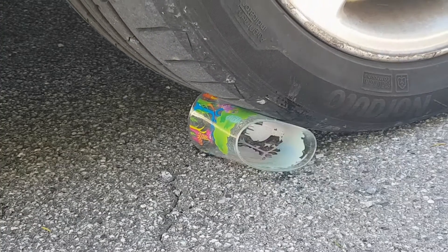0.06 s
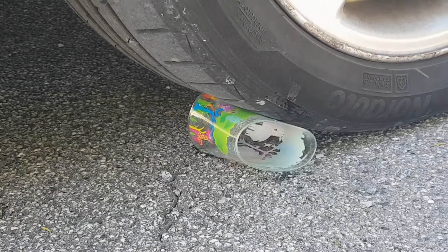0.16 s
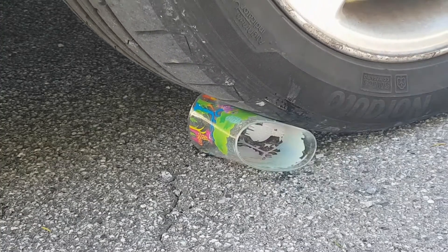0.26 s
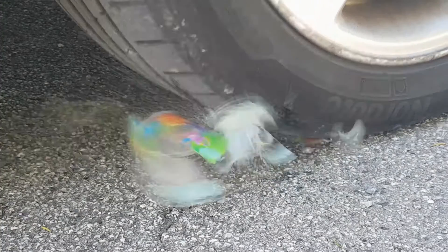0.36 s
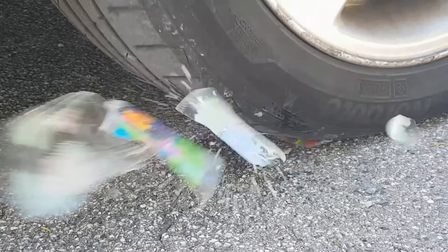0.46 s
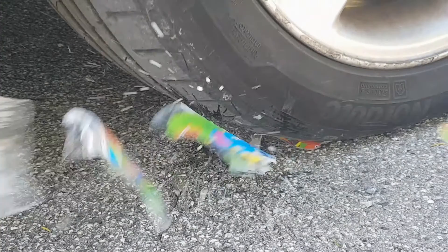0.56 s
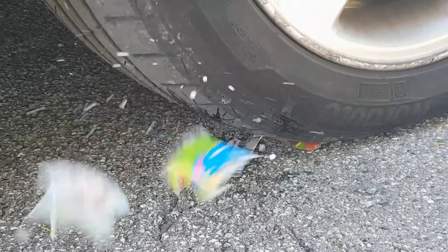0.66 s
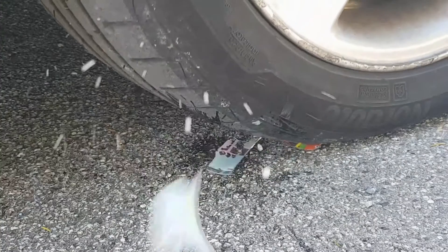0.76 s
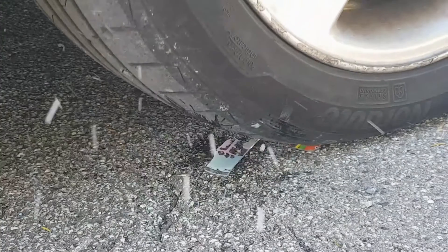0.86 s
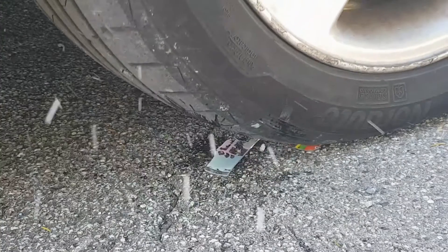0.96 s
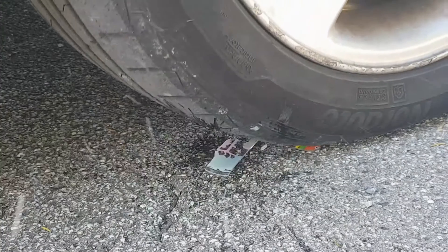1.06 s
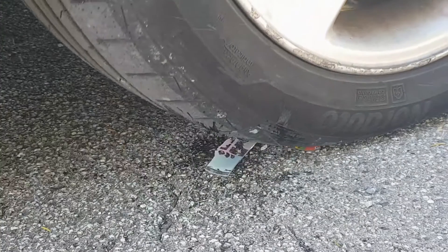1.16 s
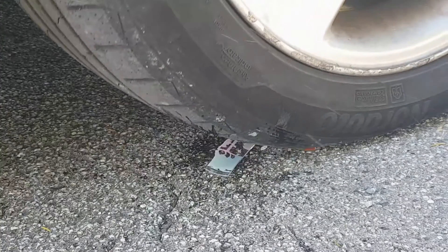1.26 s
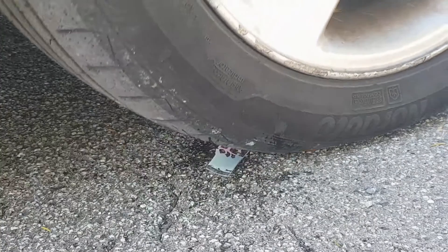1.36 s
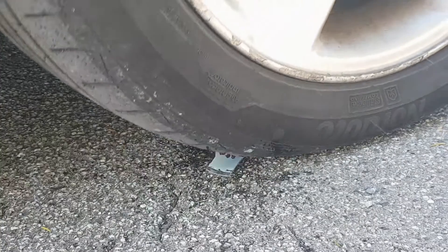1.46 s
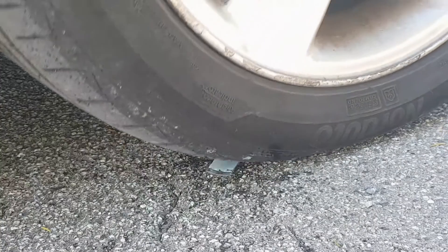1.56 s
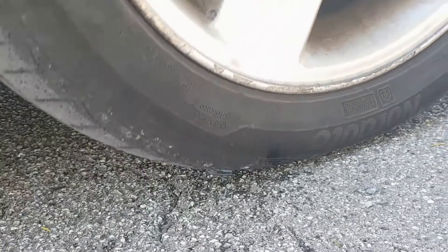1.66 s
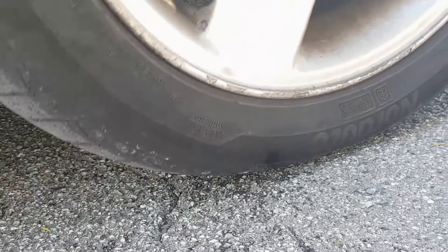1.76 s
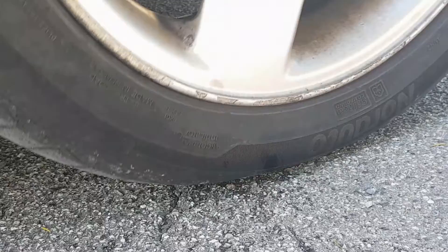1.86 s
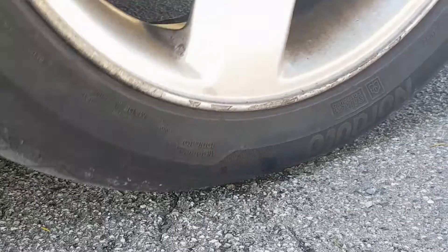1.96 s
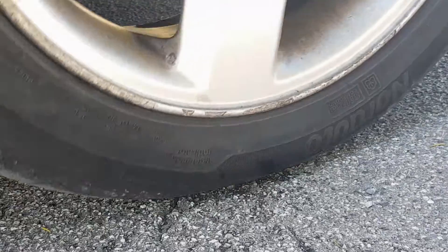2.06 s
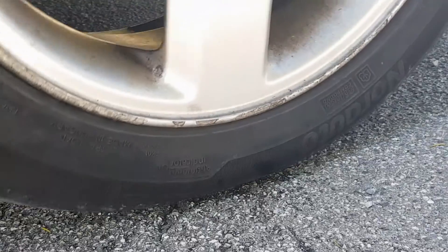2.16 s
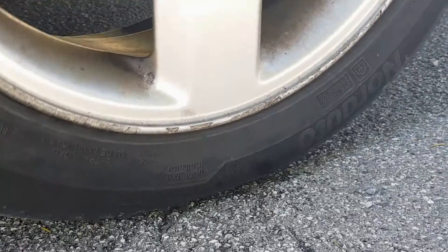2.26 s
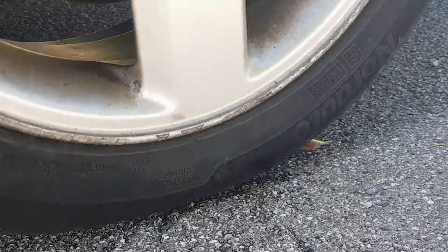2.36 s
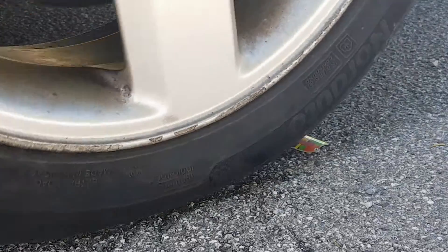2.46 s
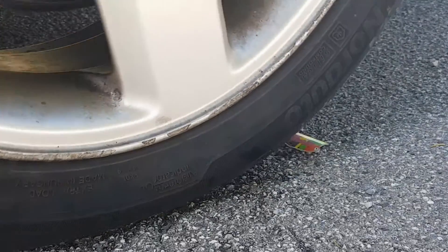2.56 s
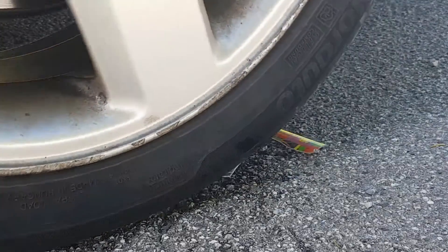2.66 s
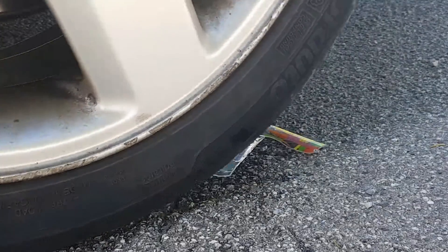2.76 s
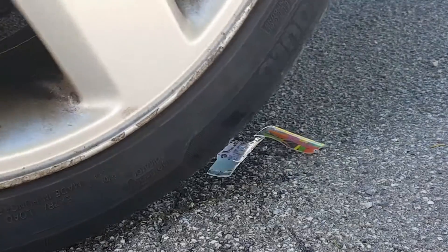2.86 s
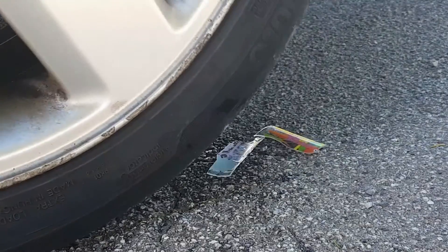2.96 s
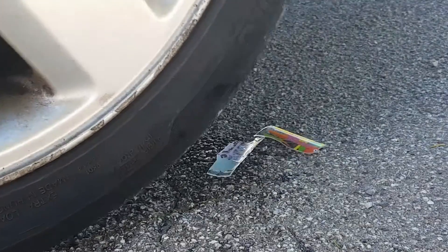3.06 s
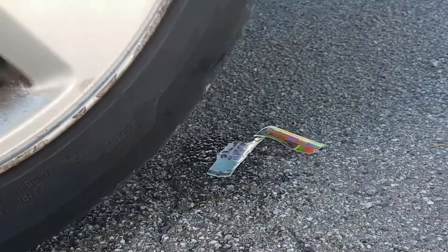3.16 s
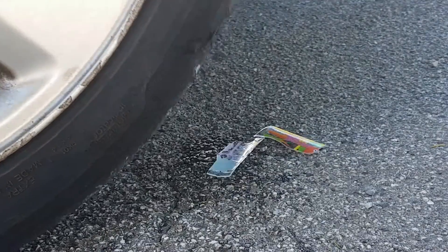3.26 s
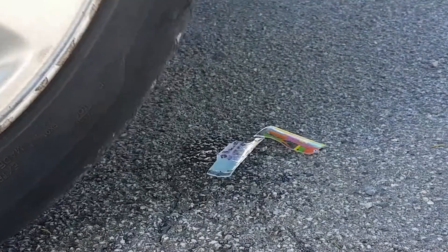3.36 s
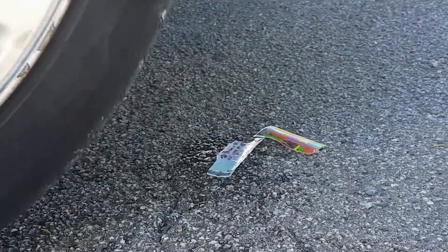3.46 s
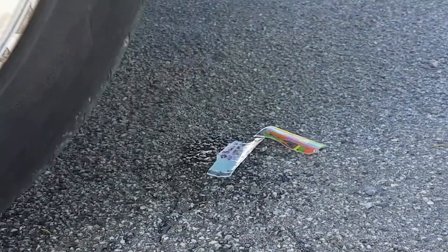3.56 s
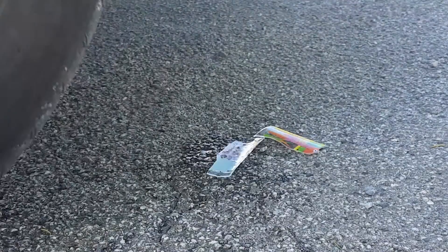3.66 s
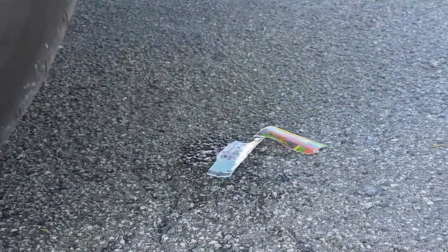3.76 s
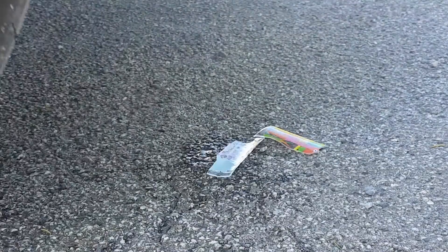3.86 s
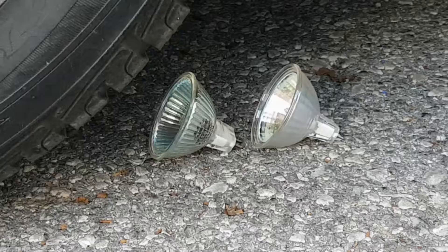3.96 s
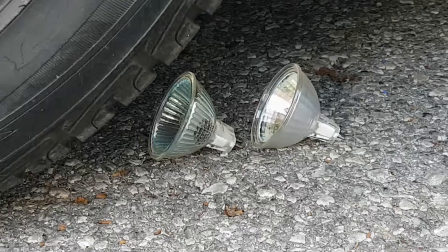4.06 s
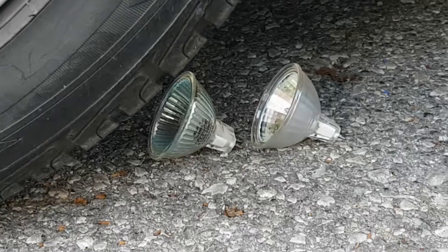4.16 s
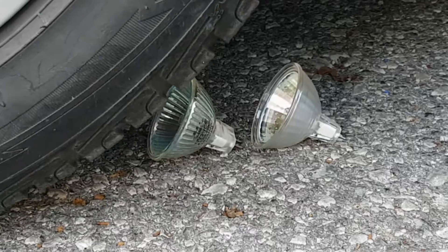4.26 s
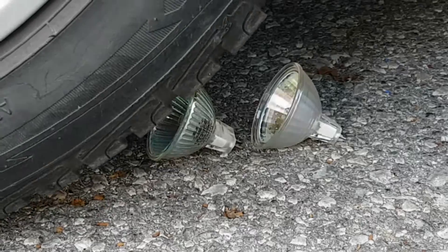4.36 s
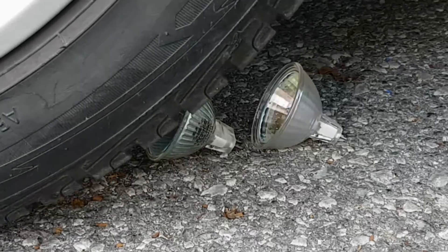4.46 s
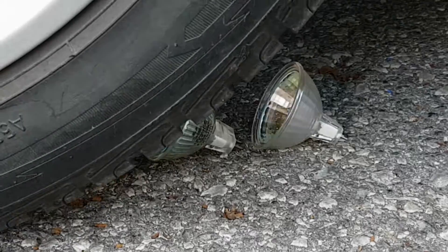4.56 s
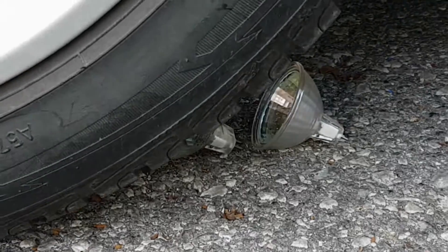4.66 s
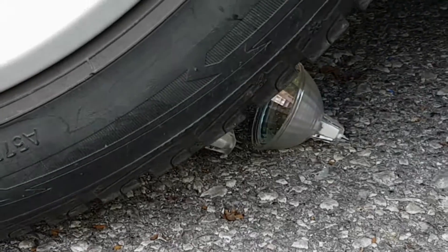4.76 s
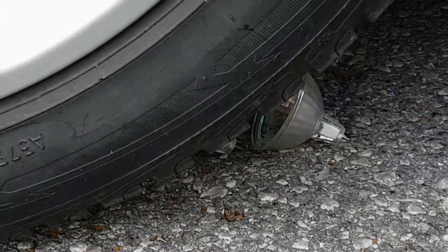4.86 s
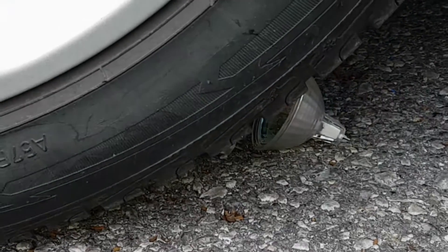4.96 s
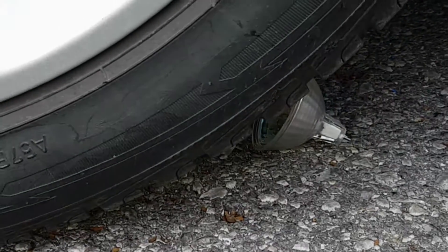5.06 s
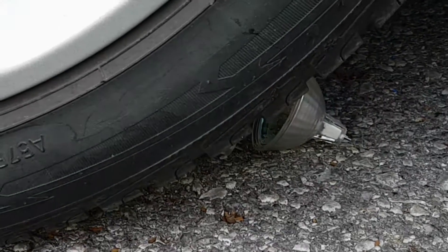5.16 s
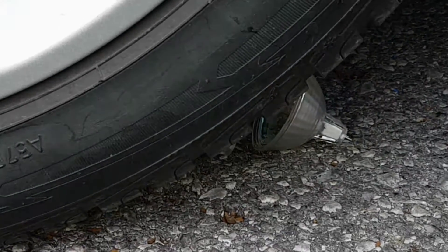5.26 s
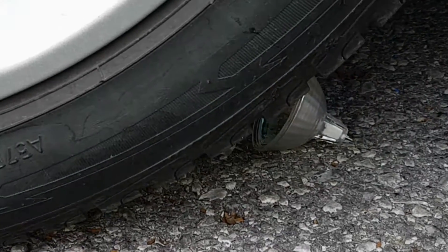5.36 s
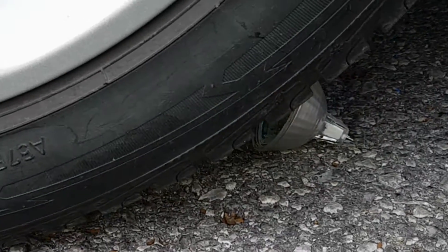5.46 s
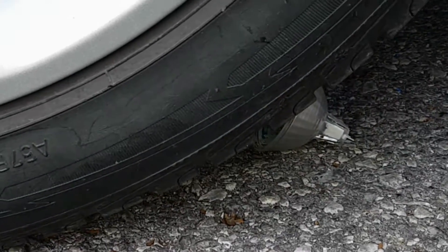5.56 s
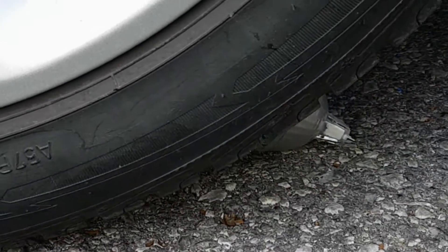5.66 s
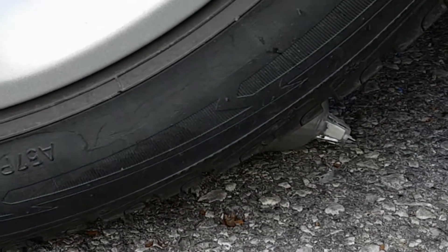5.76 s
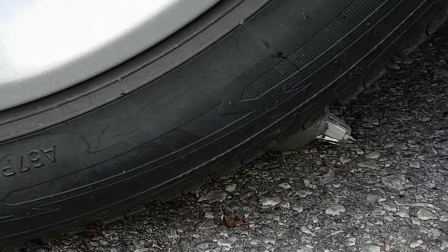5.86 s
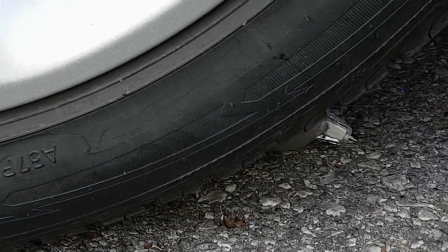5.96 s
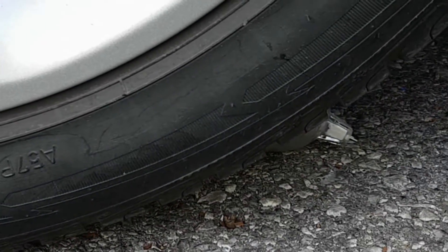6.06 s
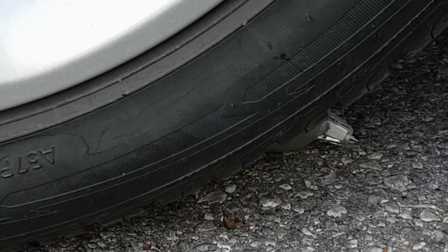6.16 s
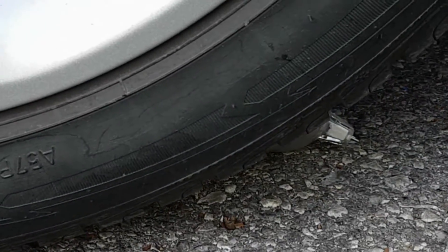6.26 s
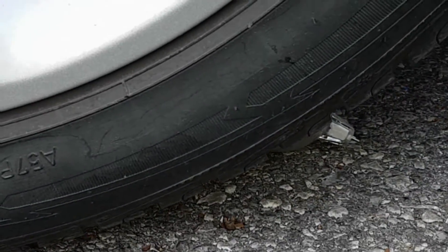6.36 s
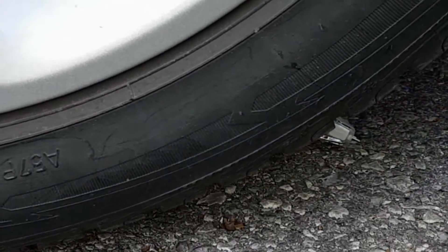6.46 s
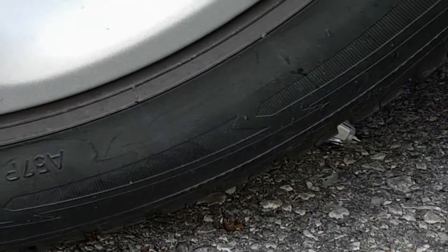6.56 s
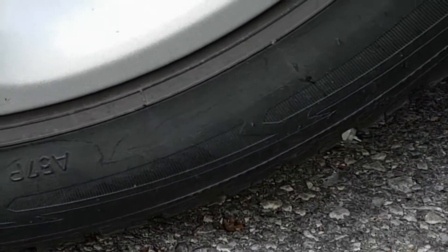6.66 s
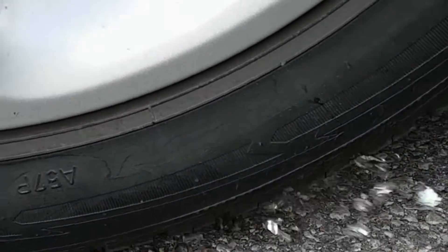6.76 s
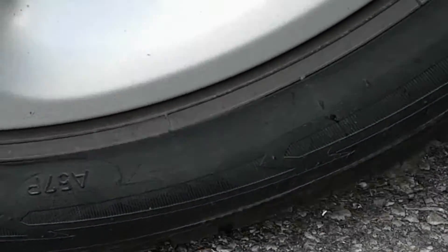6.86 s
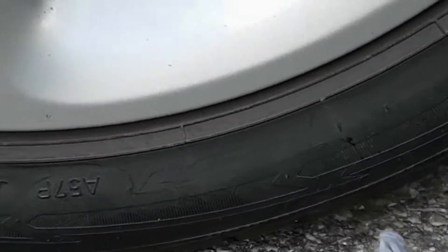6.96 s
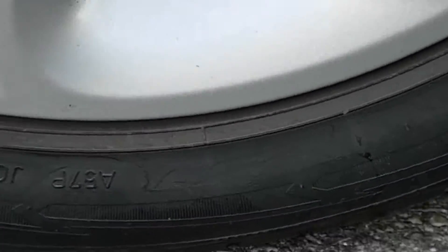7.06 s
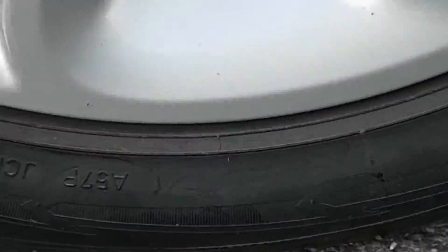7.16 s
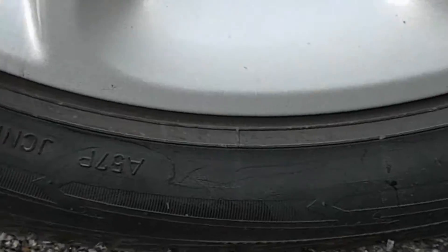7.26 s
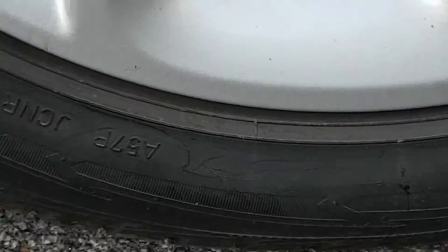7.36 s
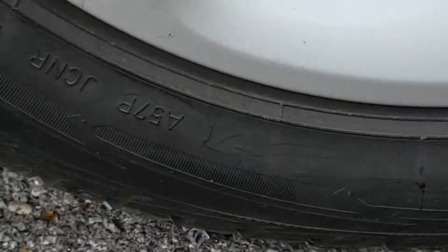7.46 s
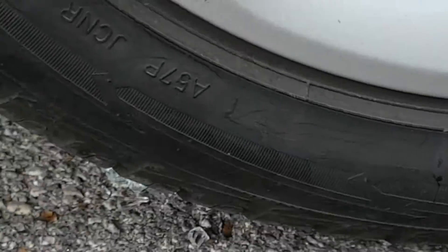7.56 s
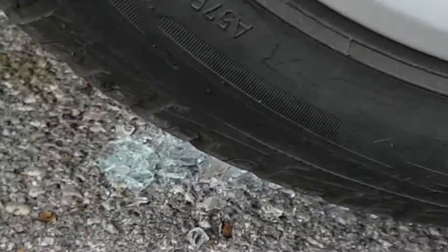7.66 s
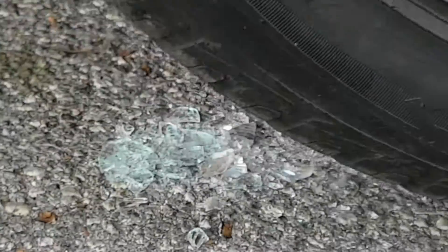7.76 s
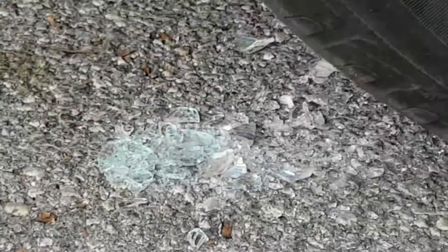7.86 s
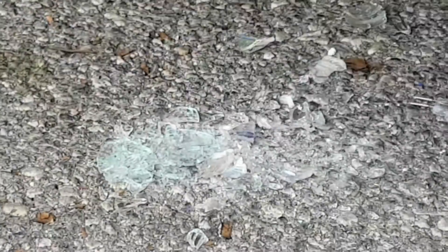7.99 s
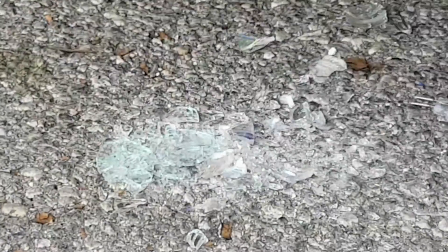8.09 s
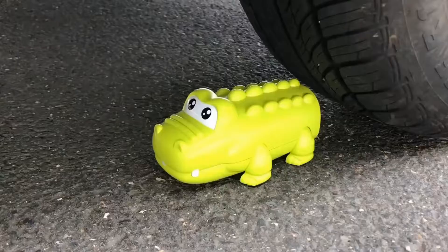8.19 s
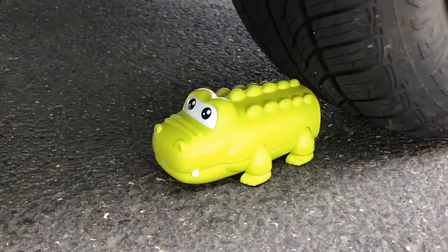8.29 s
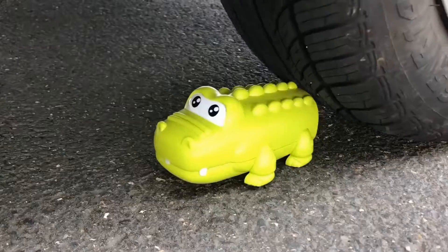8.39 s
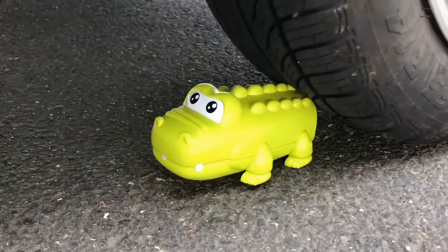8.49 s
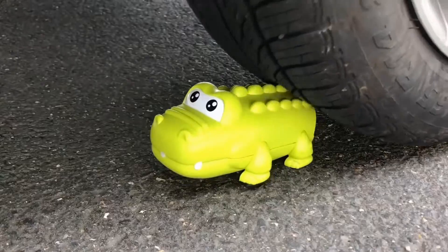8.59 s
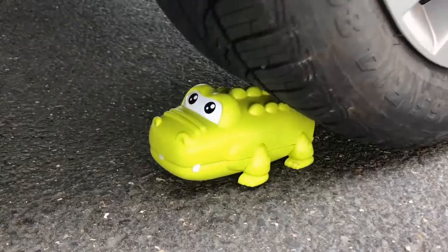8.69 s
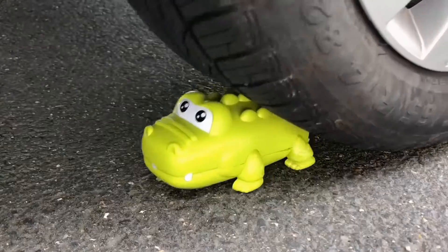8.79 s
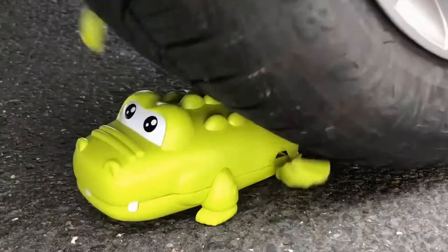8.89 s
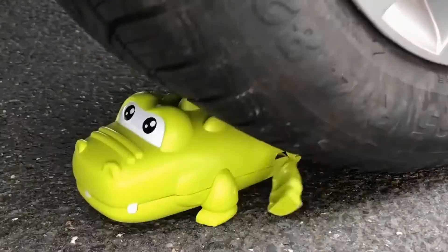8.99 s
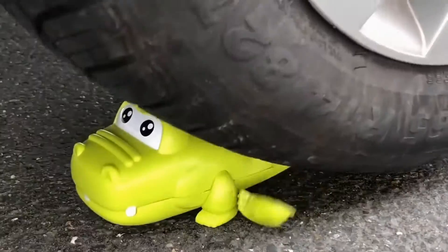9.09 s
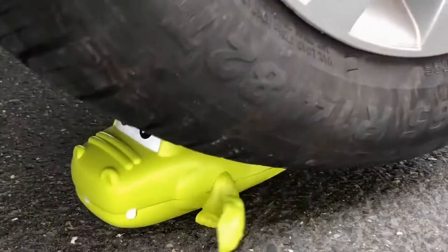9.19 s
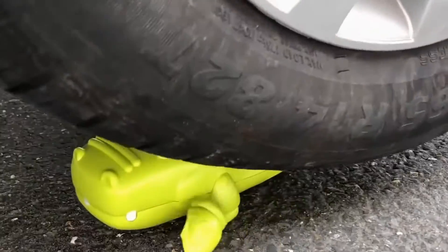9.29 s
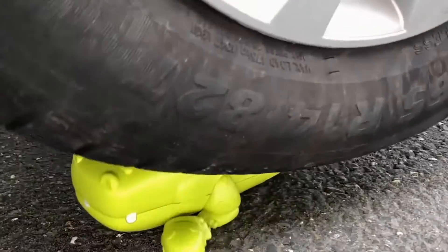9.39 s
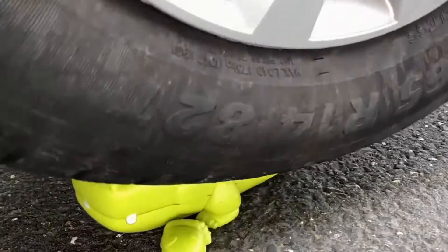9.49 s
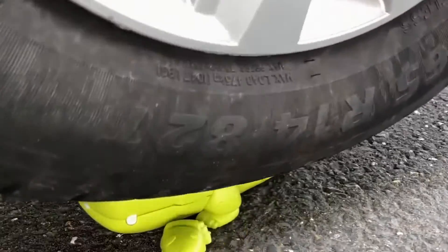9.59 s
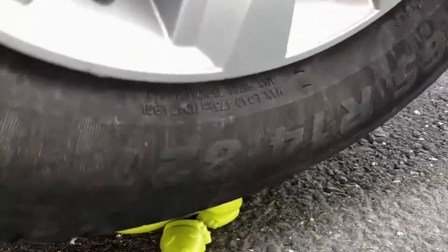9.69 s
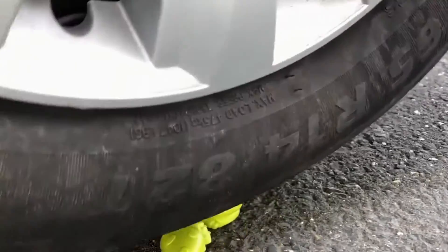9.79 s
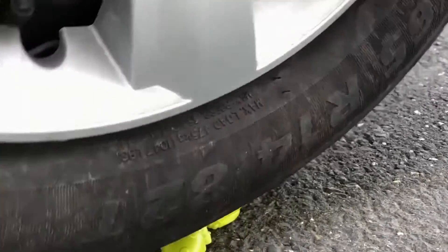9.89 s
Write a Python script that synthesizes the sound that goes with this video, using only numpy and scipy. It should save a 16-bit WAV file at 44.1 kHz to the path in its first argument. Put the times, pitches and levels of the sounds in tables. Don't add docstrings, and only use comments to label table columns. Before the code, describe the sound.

Close outdoor sound of a car wheel on asphalt, in three abrupt scenes. At about 0.4 s a plastic cup bursts in a slowed, smeared noisy swell with small tonal shards; a second, shorter burst follows at 1.24 s, with sharp snaps around 1.4 s. From 2 to 3.8 s the engine rushes by with faint whines, grit stones snap and the tread hums unsteadily, sinking in pitch. From 4 s an engine idles with a low, steady throb. From 6.7 to 7.6 s two lamps break in dull, hard pops, with very high glass ringing and a brief beating shriek; the engine fades beneath. At 8.3 s a dry mono scene begins: the tyre grinds and groans on a hollow plastic toy, with dull snaps, bright overloaded cracks from 8.8 s, rattly ticks after 9 s, a heavy collapse thump at 9.77 s and final cracks to 9.9 s.

```python
import sys
import numpy as np
from scipy import signal
from scipy.fft import rfft, irfft, next_fast_len
from scipy.io import wavfile

SR = 44100
rng = np.random.default_rng(int(sys.argv[2]) if len(sys.argv) > 2 else 0)


def how_loud(loudness_db):
    steps = np.asarray(loudness_db, float) / 20
    return 10 ** steps


def persist_wave(psi):
    counts = np.round(np.clip(psi, -1, 1) * 32767).astype(np.int16)
    wavfile.write(sys.argv[1], SR, np.atleast_2d(counts).T)


N = 437913

# time_s, level_db
CUP_TEARS = [
    [(0.3, -90), (0.338, -31.5), (0.372, -23.5), (0.389, -13.5), (0.41, -18), (0.498, -22), (0.542, -35),
     (0.82, -68)],
    [(1.08, -60.5), (1.244, -17), (1.28, -40), (1.36, -45), (1.384, -60), (1.4, -50), (1.42, -43),
     (1.51, -57.5), (1.8, -103.5)],
]
# freq_hz, density_db_per_hz
CUP_TONE = [(35, -28.5), (60, -6), (280, -5.5), (345, -11.5), (467, -1), (525, -20.5), (604, -5.5),
            (1010, -10), (1190, -13.5), (1650, -11.5), (13100, -16.5), (15800, -16)]
# freq_hz, width_hz, gain_db
CUP_WALLS = [
    [(1270, 220, 11), (3550, 500, 5), (6200, 300, 4)],
    [(2950, 800, 10), (5800, 700, 3)],
]
# bass_db, bass_rise_db_per_db_faded, treble_db, treble_rise_db_per_db_faded
CUP_SHARES = [
    (-8, 0.1854, -8.5, 0.0071),
    (-18.5, .5, -13.5, 0.1156),
]
# start_s, peak_db, bass_db, t60_s, ring_hz
SHARDS = [
    (0.1, -52, -30, 0.08, 5500),
    (0.219, -49.5, -7, 0.12, 2200),
    (0.9347, -50, -8, 0.072, 5550),
    (1.1194, -42.5, -15, 0.13, 2290),
    (1.394, -26.5, -16, 0.04, 3470),
    (1.4252, -14.5, -42, 0.034, 3100),
    (1.5847, -46, -24, 0.063, 2650),
]
# start_s, length_s, pitch_hz, level_db
PIECES = [(0.05, 0.22, 735, -59), (0.365, 0.05, 500, -30), (0.41, 0.09, 1270, -32), (0.44, 0.07, 660, -37),
          (0.49, 0.09, 130, -37), (0.5, 0.16, 1200, -46), (0.55, 0.17, 660, -49), (0.6, 0.5, 222, -61),
          (6.76, 0.3, 232, -35), (7.15, 0.25, 232, -41)]
# start_s, length_s, pitch_hz,
# level_db
SHIVERS = [(.34, .04, 1350, -33), (.372, 0.035, 796, -25), (.372, 0.028, 1150, -22), (.41, .07, 1150, -29),
           (2.9, .8, 900, -46.5), (.385, 0.027, 3600, -34), (.4, .05, 6200, -38), (.41, .03, 3300, -32),
           (.44, 0.028, 2100, -30), (.5, 0.073, 1250, -43), (.57, 0.033, 4750, -50), (.6, .045, 2000, -50),
           (.61, 0.044, 3750, -50), (.65, 0.096, 250, -47.5), (1.11, .06, 2400, -49),
           (1.15, .05, 2700, -44), (1.3, .03, 5000, -54), (1.31, .04, 950, -48), (1.365, .03, 850, -48),
           (1.395, 0.016, 3300, -43), (1.4, .25, 240, -58)]
# start_s, peak_db
GRIT = [(2.048, -31.5), (2.222, -19.5), (2.325, -19.5), (2.469, -19.5), (2.559, -19), (2.949, -27)]
# time_s, hum_db, hum_hz
SLIP = [(1.77, -64.5, 784), (2.24, -37, 820), (2.46, -34, 838), (2.59, -44, 735.4), (3.38, -45.5, 704.4),
        (3.53, -40, 678), (3.76, -54, 632), (3.99, -94, 614)]
# pitch_ratio, level_db, width_hz
STRANDS = [
    (1, 0.5, 90),
    (0.86, -7, 50),
    (1.09, -6, 90),
]
# time_s, engine_db
ROLL = [(0.0, -53.5), (0.29, -58.5), (0.39, -40), (0.6, -60.5), (0.85, -67), (0.93, -60.5), (1.02, -66),
        (1.24, -44), (1.52, -61.5), (1.77, -59), (2.24, -42.5), (2.46, -39), (2.59, -41), (3.53, -39.5),
        (3.76, -57), (3.99, -77.5)]
# freq_hz, density_db_per_hz
ROLL_TONE = [(15, -42.5), (25, -17), (82, -5), (194, -10.5), (248, 0.5), (291, -9), (637, -11), (1120, -17),
             (1780, -18.5), (3700, -22.5), (4500, -25.5), (8050, -25.5), (9720, -33), (14600, -23),
             (15800, -40.5)]
# pitch_hz, level_db
WHINES = [(253, -45.5), (1351, -57), (2030, -55.5), (3050, -58), (6379, -60.5), (8123, -62), (12764, -68.5)]

# start_s, peak_db, bass_db, t60_s, ring_hz
POPS = [(6.716, -28.5, -5.5, 0.087, 860), (6.741, -22, -2, 0.044, 760), (6.793, -6, -8.5, 0.041, 730),
        (6.817, -35, 6, 0.12, 1400),  (6.884, -27.5, -21, 0.068, 869), (6.921, -32, -25, 0.05, 2530),
        (6.933, -13, -4.5, 0.05, 827), (7.036, -35, -30, 0.04, 1300), (7.043, -4.5, -46, 0.028, 1360),
        (7.102, -32, -56, 0.093, 1330), (7.159, -13.5, -5, 0.057, 730), (7.207, -35, -20, 0.05, 1500),
        (7.311, -37, -26, 0.075, 1050), (7.339, -34.5, -27, 0.15, 1120), (7.372, -30, -37, 0.045, 1200),
        (7.38, -7, -47, 0.027, 1350), (7.449, -38, -30, 0.043, 2000), (7.461, -28, -15, 0.05, 810),
        (7.469, -14, -12.5, 0.058, 1124), (7.499, -27.5, -18, 0.071, 1920),
        (7.548, -36.5, -51.5, 0.099, 1370), (7.557, -35, -50, 0.06, 3400), (7.639, -46, -31, 0.056, 1570)]
# start_s, upper_db, lower_db, t60_s
GLASS = [(6.8, -42.5, -28.5, 0.26), (6.893, -16, -30, 0.09), (6.883, -45, -30, 0.15),
         (6.978, -34, -60.5, 0.13), (7.057, -33, -25, 0.13), (7.072, -20.5, -60, 0.07),
         (7.16, -51, -39, 0.17), (7.224, -35, -30, 0.33), (7.25, -41, -34, 0.22), (7.335, -29, -35, 0.12),
         (7.446, -38, -36, 0.15), (7.474, -55, -35, 0.19), (7.59, -66, -55, 0.23)]
# upper_hz, lower_hz
GLASS_HZ = (13950, 10000)
# upper_db, lower_db
GLASS_LEAN_DB = (6, -2.3)
# start_s, length_s, right_db, left_db, beat_hz
PING = (6.881, 0.016, -3.5, -11.5, 140)
# start_s, length_s, pitch_hz, level_db
HOUSINGS = [(6.81, 0.027, 1400, -38), (6.815, .035, 224, -23), (6.86, .06, 900, -37),
            (6.865, 0.021, 1540, -36), (6.93, 0.014, 1050, -21), (6.95, .02, 250, -31),
            (6.75, .45, 95, -40), (7.04, .012, 1100, -26), (7.04, .012, 2100, -26),
            (7.157, .02, 1102, -24.5), (7.375, .014, 1248, -14), (7.376, .01, 2750, -29),
            (7.466, .02, 2100, -28.5), (6.98, 0.066, 201, -34), (7.2, .018, 220.7, -26),
            (7.32, 0.062, 237, -44), (7.39, 0.026, 1150, -38), (7.488, 0.014, 300, -30),
            (7.52, .08, 897, -48)]
# time_s, engine_db, firing_hz
IDLE = [(4.031, -38.5, 39.4), (5.1, -40, 46), (5.4, -39.5, 41), (6.0, -40, 40.3), (6.6, -37.5, 36.4),
        (6.826, -38, 47), (7.432, -53, 39.6), (7.786, -78.5, 36), (8.235, -86.5, 35)]
# freq_hz, density_db_per_hz
IDLE_TONE = [(15, -41.5), (25, -9.5), (76, 1), (123, -4.5), (157, -1), (205, -10.5), (284, -5.5),
             (1010, -13.5), (1280, -16), (3780, -20), (4820, -34.5), (6850, -24), (9720, -42.5),
             (12700, -28), (15800, -38.5)]
# freq_hz, width_hz, gain_db
DRONES = [(157.5, 17, 7.5), (286, 31, 4), (1380, 112, 4.5)]

# start_s, peak_db, bass_db, t60_s, ring_hz
SNAPS = [(8.32, -36.5, -25, 0.046, 2340), (8.4092, -34.5, -20, 0.044, 1750), (8.4482, -22, -45, 0.04, 3000),
         (8.4525, -14, -39, 0.038, 4270), (8.5, -28, -30, 0.06, 3000), (8.5077, -30.5, -13, 0.11, 1430),
         (8.5255, -15.5, -32, 0.03, 2460), (8.5417, -23.5, -25, 0.03, 1920), (8.6277, -8, -18, 0.025, 1220),
         (8.6346, -21.5, -6.5, 0.031, 1360), (8.6442, -22.5, -18, 0.087, 1400),
         (8.6597, -23, -19, 0.033, 1660), (9.1332, -5, -34, 0.022, 2700), (9.1746, -16, -24, 0.022, 2050),
         (9.2912, 7, -33.5, 0.017, 2140), (9.334, -39.5, -10, 0.049, 1130),
         (9.7657, -31.5, 1.5, 0.024, 1047)]
# start_s, peak_db, bass_db, t60_s, ring_hz
CRACKS = [(8.799, 0, -22, 0.033, 3310), (8.9056, -13, -57, 0.012, 9150), (8.9275, -24, -25, 0.03, 3000),
          (8.9312, -7, -42, 0.017, 3700), (8.9426, -17, -14, 0.092, 3670), (8.96, -3, -51, 0.057, 5020),
          (8.9646, -26.5, -8, 0.11, 3380), (9.0268, -39, -30, 0.03, 5960), (9.1822, -18, -44, 0.026, 3840),
          (9.7242, -1.5, -28, 0.021, 4920), (9.8271, 10.5, -26, 0.011, 3370), (9.868, 0, -26, 0.016, 2470),
          (9.9254, -46.5, -23, 0.042, 2730)]
# start_s, peak_db, push_s
THUMPS = [
    (8.93, -18.5, 0.001),
    (8.967, -22, 0.0013),
    (9.7659, 0.5, 0.00058),
    (9.803, -22, 0.0014),
]
# start_s, peak_db
TICKS = [(9.032, -36), (9.051, -39), (9.064, -26), (9.2423, -24), (9.255, -20), (9.27, -24),
         (9.4705, -33.5), (9.4968, -17), (9.5096, -11), (9.529, -42), (9.5503, -19), (9.5662, -28),
         (9.587, -30), (9.6797, -27.5), (9.798, -33), (9.9059, -42)]
# freq_hz, level_db, t60_s
SHELL = [(2530, -39, 0.055), (3055, -38, 0.034), (3800, -5, 0.056), (4260, -8, 0.055), (4780, -26, 0.021),
         (5180, 1.5, 0.025), (6400, 10, 0.016), (7410, -26, 0.035), (8540, -38, 0.1)]
# freq_hz, level_db, t60_s
LID = [(2180, -26.5, 0.97), (3410, -16, 0.065), (3962, -14.5, 0.048), (4920, -17, 5.0), (6481, -25, 5.0),
       (7160, -13, 0.39), (7200, 2, 0.017), (7483, -9, 0.021), (8231, -18.5, 0.13), (8667, -20, 0.34),
       (8796, -19, 0.26), (10020, -11.5, 0.0385)]
# start_s, peak_db, damped_after_s
LID_HIT = (8.975, -7.5, 0.024)
# start_s, length_s, pitch_hz, level_db
PANELS = [(8.505, .015, 1400, -27), (8.74, 0.064, 2180, -44), (8.798, .014, 4100, -17),
          (8.959, .012, 5000, -18), (8.93, .075, 159, -27), (9.13, 0.0094, 2576, -19.5),
          (9.17, 0.011, 810, -34), (9.24, 0.048, 1000, -47), (9.288, 0.01, 745, -21.5),
          (9.295, 0.014, 3440, -30.5), (9.51, .012, 2600, -32.5), (9.77, 0.087, 551, -46),
          (9.875, 0.018, 2500, -36.5)]
# time_s, level_db
GRIND = [(8.311, -45.5), (8.41, -44.5), (8.5, -37), (8.6, -40), (8.7, -38), (8.8, -40.5), (8.85, -59),
         (9.026, -64), (9.12, -55), (9.292, -53), (9.44, -62), (9.46, -50.5), (9.59, -53), (9.655, -59.5),
         (9.672, -42), (9.704, -50.5), (9.93, -65)]
# freq_hz, density_db_per_hz
GRIND_TONE = [(15, -34), (25, -9), (113, -2), (144, -8.5), (222, -16), (955, -19.5), (1060, -18.5),
              (1930, -20.5), (4330, -29.5), (6140, -40), (7420, -39.5), (15800, -60.5)]
# time_s, pitch_hz, level_db
GROAN = [(8.32, 79.9, -35), (8.55, 80.5, -28), (8.7, 113.3, -38), (8.79, 117.5, -25), (8.86, 122.5, -55),
         (8.966, 126.2, -36), (9.15, 112.2, -46), (9.35, 71.5, -43.5), (9.43, 90.1, -64),
         (9.5, 110.2, -42.5), (9.93, 107.1, -36)]

# freq_hz, left_minus_right_db
LEAN = [(60, 1.5), (240, -1.5), (950, -2.5), (3770, -7), (15000, -4.5)]
TYRE_HZ = 239.3


def cracks(out, events, bright_db, dulls, rise_s, snap_db, ring_db, tail_db, tyre_db,
           low_hz, high_hz, top_hz, boost_db, channels, air_db=0):
    t = np.arange(4096) / SR

    def tone(f):
        rolloff_db = -12 * np.log2(1 + (170 / f) ** 2) - 6 * np.log2(1 + (f / top_hz) ** 6)
        return rolloff_db + air_db / (1 + (9000 / f) ** 4)

    sides = np.array([[-1], [1]]) * (channels - 1)
    for s, db, bass_db, t60, ring_hz in events:
        burst = 0
        treble_db = bright_db - dulls * db
        for hz, x in bands(rng.standard_normal((channels, len(t))), tone, count=9):
            dies = t / (t60 * (3000 / hz) ** 0.33)
            tail = how_loud(tail_db - 60 * t / 0.27 * (2.5 + hz / 7000))
            fade = how_loud(snap_db - 179 * dies) + how_loud(-60 * dies) + tail
            rise = 1 - np.exp(-(t / (rise_s + 0.046 / hz)) ** 2)
            burst = burst + x * fade * rise * how_loud(shares(hz, bass_db + 14.0, treble_db, low_hz, high_hz))
        piece = ring(burst, ring_hz, t60 * .55)
        burst = burst + how_loud(ring_db) * piece * np.std(burst) / np.std(piece)
        burst = burst + how_loud(tyre_db) * ring(burst, TYRE_HZ, 0.19) * (1 - t / t[-1])
        add(out, s - rise_s / 2, burst * (1 - (t / t[-1]) ** 4) * how_loud(db + boost_db + sides))


def cup_bursts(out):
    for rows, wall, colour in zip(CUP_TEARS, CUP_WALLS, CUP_SHARES):
        bed(out, rows, lambda f: at_hz(CUP_TONE, f) + peaks(f, wall), colour,
            grain_db=2.5, grain_rate_hz=260, patchy_db=3, low_hz=900, lean=.4)
    sing(out, PIECES, width_hz=35, lean_db=0.5)
    sing(out, SHIVERS, width_hz=170, lean_db=1.2)
    cracks(out, SHARDS, bright_db=-22.5, dulls=0.37, rise_s=0.011, snap_db=-7.5, ring_db=-4.5, tail_db=-35.5,
           tyre_db=-59, low_hz=1400, high_hz=7600, top_hz=16000, boost_db=1.5, channels=2)


def lamp_pops(out):
    cracks(out, POPS, bright_db=-28, dulls=0.272, rise_s=.004, snap_db=5, ring_db=-5.5, tail_db=-18.5,
           tyre_db=-47, low_hz=498, high_hz=2700, top_hz=16000, boost_db=0, channels=2, air_db=7)
    sing(out, HOUSINGS, width_hz=90, lean_db=1.0)


def toy_breaks(out):
    from_s = 8.3
    for events, bright_db, thin_hz in ((SNAPS, -48, 380), (CRACKS, -7, 120)):
        breaks = np.zeros((2, N))
        cracks(breaks, events, bright_db, dulls=0.01, rise_s=0.00018, snap_db=11.0, ring_db=-11.5,
               tail_db=-28.5, tyre_db=-84, low_hz=1730, high_hz=7720, top_hz=12130, boost_db=-9.5, channels=1)
        thin = signal.butter(4, thin_hz, "high", fs=SR, output="sos")
        clipped = np.tanh(breaks[0, round(from_s * SR):])
        add(out, from_s, signal.sosfilt(thin, clipped + 1e-18))
    sing(out, PANELS, width_hz=120, lean_db=0, channels=1)


def toy_thumps(out):
    t = np.arange(4096) / SR
    for s, db, push_s in THUMPS:
        u = t / push_s - 4
        pulse = -u * np.exp(.5 - u ** 2 / 2) * (.82 + .18 * np.tanh(u))
        rebound = .24 * np.exp(-((u - 6) / 3.5) ** 4)
        add(out, s - 3 * push_s, how_loud(db) * (pulse + rebound))


def shell_ticks(out):
    for s, db in TICKS:
        add(out, s, how_loud(db) * struck(SHELL, 0.85, blow_s=.012, spread_db=4))


def loose_lid(out):
    s, db, lasts_s = LID_HIT
    t = np.arange(4096) / SR
    damping = 1 + np.exp((t - lasts_s) / .0012)
    add(out, s, how_loud(db) * struck(LID, 1.0, blow_s=0.0027, spread_db=0.5) / damping)


def glass_fragments(out):
    t = np.arange(1, 8192) / SR
    for s, *levels_db, t60 in GLASS:
        envelope_db = -10 - 60 * t / t60 + 20 * np.log10(1 - np.exp(-t / .004))
        for hz, db, lean_db in zip(GLASS_HZ, levels_db, GLASS_LEAN_DB):
            narrow(out, s, db + envelope_db, hz, width_hz=220, lean_db=lean_db, steady=0.5)


def glass_ping(out):
    s, lasts_s, right_db, left_db, beat_hz = PING
    t = np.arange(int(lasts_s * SR)) / SR
    turn = 2 * np.pi * GLASS_HZ[0] * t + [[np.pi / 2], [0]]
    pair = .75 * np.sin(turn) + .25 * np.sin(turn + 2 * np.pi * beat_hz * t + 1.2)
    add(out, s, pair * np.sqrt(np.sin(np.pi * t / lasts_s)) * how_loud(np.array([[left_db], [right_db]])))


def grit_stones(out):
    slip_s, _, slip_hz = np.transpose(SLIP)
    stones = [(s, db, -15, 0.07, np.interp(s, slip_s, slip_hz)) for s, db in GRIT]
    cracks(out, stones, bright_db=-18, dulls=0.31, rise_s=0.017, snap_db=10.0, ring_db=-6, tail_db=-21,
           tyre_db=-36, low_hz=500, high_hz=4795, top_hz=16000, boost_db=-2.0, channels=2)


def tread_hum(out):
    s, (hum_db, hum_hz) = along(SLIP)
    size = len(hum_hz)
    for ratio, db, width_hz in STRANDS:
        level_db = hum_db + db + 3.1 * drift(14, size)[0]
        pitch_hz = ratio * hum_hz * (1 + .04 * drift(12, size)[0])
        narrow(out, s, level_db, pitch_hz, width_hz, lean_db=1)


def tyre_grind(out):
    bed(out, GRIND, lambda f: at_hz(GRIND_TONE, f), (1.5, 0.05, 5, -0.3),
        grain_db=3.5, grain_rate_hz=140, patchy_db=1.5, low_hz=300, lean=0, channels=1)
    s, (groan_hz, groan_db) = along(GROAN)
    narrow(out, s, groan_db - 4.5, groan_hz, width_hz=22, lean_db=0, steady=1, channels=1)


def engine_roll_by(out):
    bed(out, ROLL, lambda f: at_hz(ROLL_TONE, f), (-8.5, 0.03, -10.5, -0.005),
        grain_db=1.6, grain_rate_hz=160, patchy_db=1.2, low_hz=400, lean=.55)
    s, (engine_db,) = along(ROLL)
    arrives_db = np.clip(25 * (np.arange(len(engine_db)) / SR - 2.0), -30, 0)
    for hz, db in WHINES:
        level_db = engine_db - engine_db.max() + db + arrives_db * (hz > 500)
        narrow(out, s, level_db, hz, width_hz=10, lean_db=0.5, steady=0.4)


def engine_idle(out):
    s, (engine_db, firing_hz) = along(IDLE)
    throb_db = 2.43 * np.sin(2 * np.pi * np.cumsum(firing_hz) / SR)
    bed(out, IDLE, lambda f: at_hz(IDLE_TONE, f) + peaks(f, DRONES), (-3.5, -0.08, -5.5, 0.2),
        grain_db=1.68, grain_rate_hz=150, patchy_db=2.5, low_hz=402, lean=1, throb_db=throb_db)
    for order, db in ((1, -13.0), (2, -11.0), (3, -12.0)):
        narrow(out, s, engine_db + db, order * firing_hz, width_hz=5.14, lean_db=-2.5)


def bed(out, rows, tone, colour, grain_db, grain_rate_hz, patchy_db, low_hz, lean, throb_db=0, channels=2):
    s, (level_db, *_) = along(rows)
    faded_db = level_db.max() - level_db
    bass_db = colour[0] + colour[1] * faded_db
    treble_db = colour[2] + colour[3] * faded_db
    size = len(level_db)
    source = rng.standard_normal((channels, next_fast_len(size)))
    grain = grain_db * drift(grain_rate_hz, size) + throb_db
    fine_db = 3.2 * drift(SR / 45, SR)[0]

    def fine_tone(f):
        return tone(f) + fine_db[f.astype(int)] / (1 + 900 / f)

    for hz, x in bands(source, fine_tone, count=12):
        db = level_db + shares(hz, bass_db, treble_db, low_hz, 5500) + patchy_db * drift(24.924, size)
        db = db + grain / (1 + 400 / hz) + lean * at_hz(LEAN, hz) * np.array([[.5], [-.5]])
        add(out, s, x[:, :size] * how_loud(db))


def sing(out, pieces, width_hz, lean_db, channels=2):
    for s, lasts_s, hz, db in pieces:
        swell = np.sin(np.pi * np.linspace(.01, .99, int(lasts_s * SR)))
        narrow(out, s, db + 20 * np.log10(swell), hz, width_hz, lean_db, steady=0.8, channels=channels)


def narrow(out, s, level_db, hz, width_hz, lean_db, steady=0, channels=2):
    size = len(level_db)
    turn = 2 * np.pi * np.cumsum(hz + 0 * level_db) / SR
    in_phase = (steady + drift(width_hz, size, channels)) * np.sin(turn)
    quadrature = drift(width_hz, size, channels) * np.cos(turn)
    add(out, s, (in_phase + quadrature) * how_loud(level_db + [[-lean_db], [lean_db]]))


def struck(modes, stretch, blow_s, spread_db):
    blow = rng.standard_normal(4096) * how_loud(-60 * np.arange(4096) / SR / blow_s)
    strengths_db = rng.normal(0, spread_db, len(modes))
    x = sum(how_loud(db + k) * ring(blow, hz, t60 * stretch) for (hz, db, t60), k in zip(modes, strengths_db))
    return x / abs(x).max() + 0.1 * np.diff(blow, prepend=0)


def ring(x, hz, t60):
    r, w = how_loud(-60 / (t60 * SR)), 2 * np.pi * hz / SR
    return signal.lfilter([0, np.sin(w)], [1, -2 * r * np.cos(w), r * r], x + 1e-18)


def bands(source, tone, count):
    hz = np.fft.rfftfreq(source.shape[-1], 1 / SR) + 1
    shape = how_loud(tone(hz)) * (hz < 15800)
    spectrum = rfft(source) * shape / np.sqrt(np.mean(shape ** 2 * (hz > 1200) * (hz < 4000)))
    log_hz = np.log(np.clip(hz, 30, 15000))
    centres = np.linspace(np.log(30), np.log(15000), count)
    for c in centres:
        mask = np.clip(1 - abs(log_hz - c) / (centres[1] - centres[0]), 0, 1)
        yield np.exp(c), irfft(spectrum * mask, source.shape[-1])


def shares(hz, bass_db, treble_db, low_hz, high_hz):
    return bass_db / (1 + (hz / low_hz) ** 4) + treble_db / (1 + (high_hz / hz) ** 4)


def peaks(hz, table):
    return sum(db / (1 + (2 * (hz - f) / w) ** 2) for f, w, db in table)


def at_hz(points, hz):
    freq_hz, db = np.transpose(points)
    return np.interp(np.log(hz), np.log(freq_hz), db)


def drift(rate_hz, size, channels=1):
    knots = rng.standard_normal((channels, 4000))
    return np.array([np.interp(np.arange(size) * rate_hz / SR, np.arange(4000), k) for k in knots])


def along(rows):
    s, *columns = np.transpose(rows)
    t = np.arange(s[0], s[-1], 1 / SR)
    return s[0], [np.interp(t, s, c) for c in columns]


def add(out, s, x):
    i = int(round(s * SR))
    out[..., i:i + x.shape[-1]] += x[..., :N - i]


def cup_scene(out):
    cup_bursts(out)
    grit_stones(out)
    tread_hum(out)
    engine_roll_by(out)


def lamp_scene(out):
    lamp_pops(out)
    glass_fragments(out)
    glass_ping(out)
    engine_idle(out)


def toy_scene():
    out = np.zeros((2, N))
    toy_breaks(out)
    shell_ticks(out)
    loose_lid(out)
    tyre_grind(out)
    overload = 0.86
    out = overload * np.tanh(out / overload)
    toy_thumps(out)
    return out


def scene():
    out = toy_scene()
    cup_scene(out)
    lamp_scene(out)
    return out


def band_limit(x):
    return signal.sosfilt(signal.butter(12, 16960, fs=SR, output="sos"), x)


def record(dry):
    top_cut = signal.cheby2(10, 60, 16950, fs=SR, output="sos")
    mix = signal.sosfilt(top_cut, np.clip(dry, -.9, .9))
    return band_limit(mix)


dry = scene()
out = record(dry)
persist_wave(out)
```